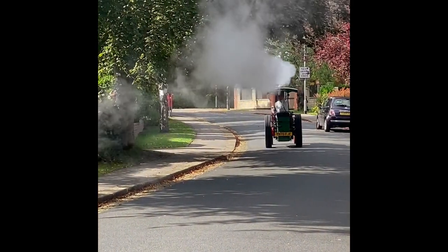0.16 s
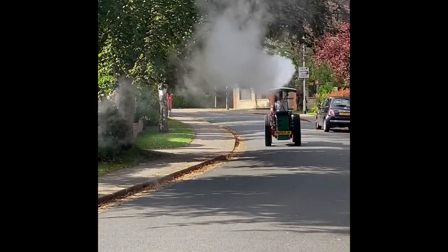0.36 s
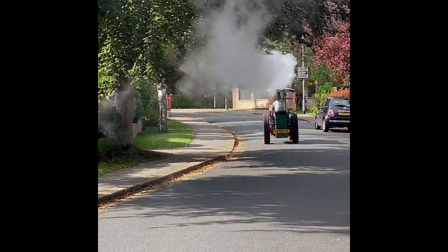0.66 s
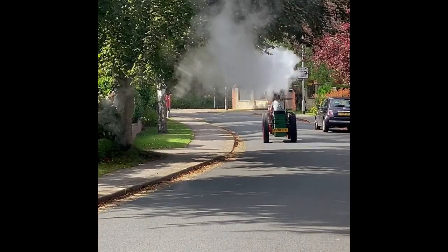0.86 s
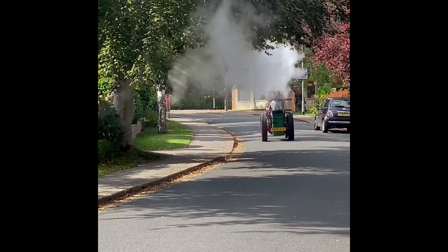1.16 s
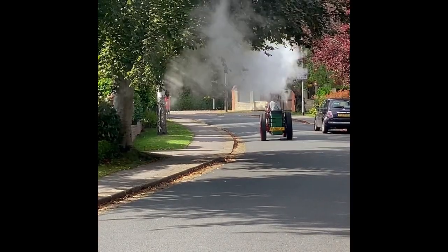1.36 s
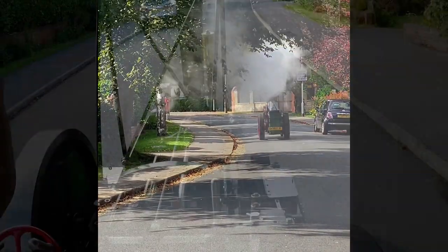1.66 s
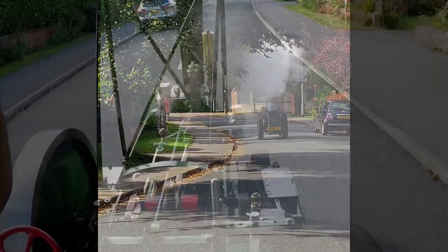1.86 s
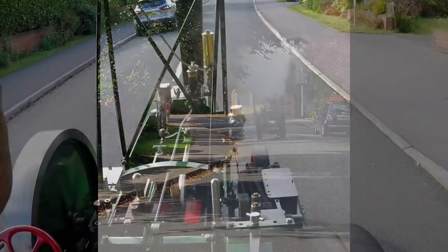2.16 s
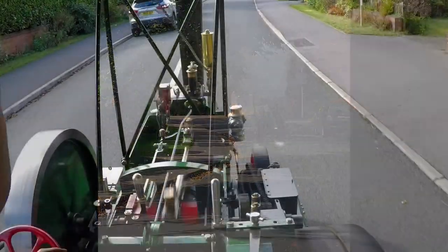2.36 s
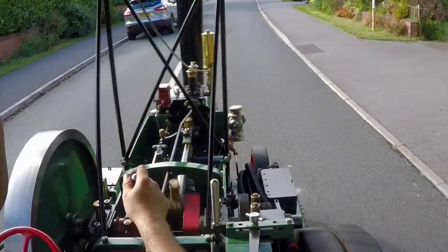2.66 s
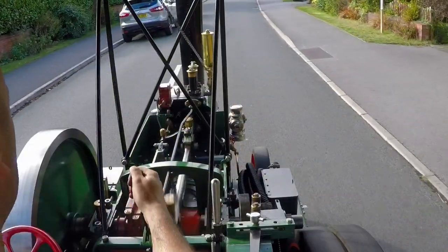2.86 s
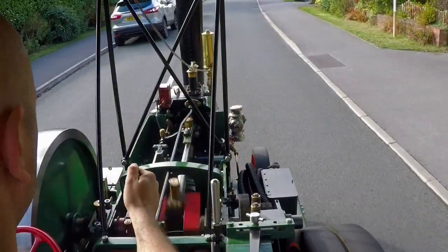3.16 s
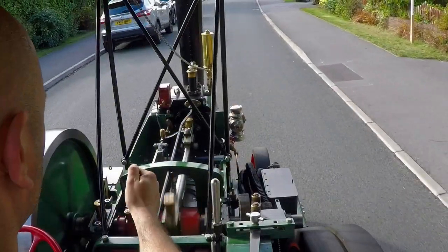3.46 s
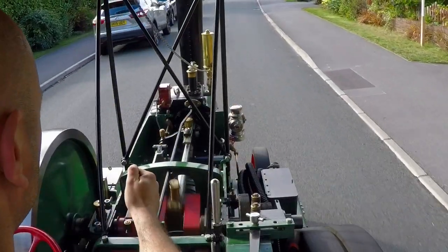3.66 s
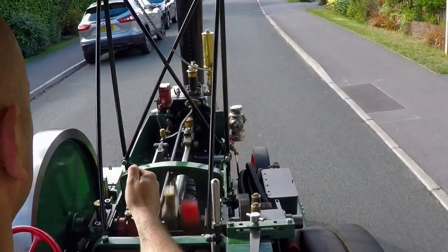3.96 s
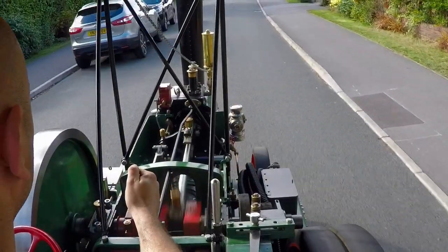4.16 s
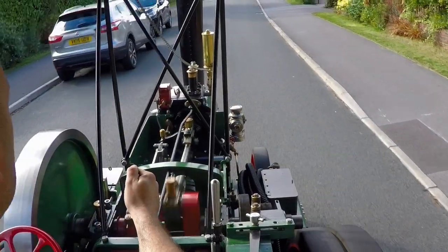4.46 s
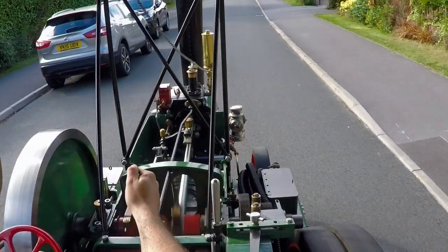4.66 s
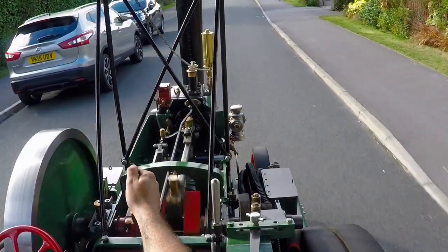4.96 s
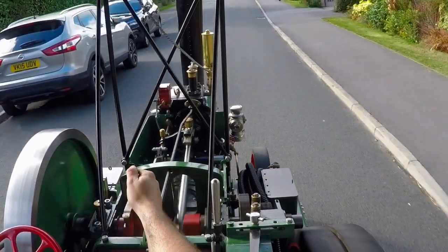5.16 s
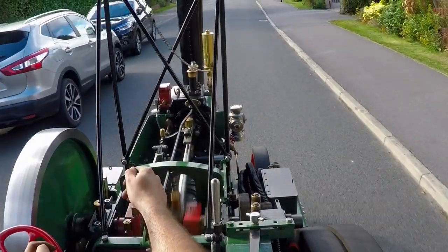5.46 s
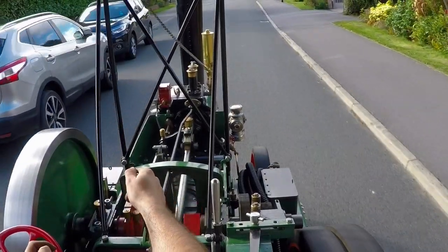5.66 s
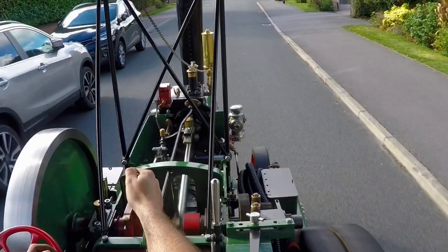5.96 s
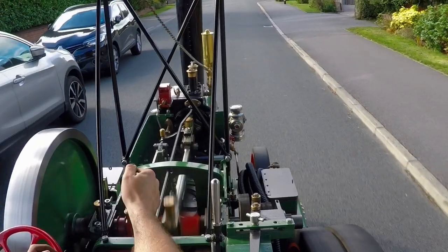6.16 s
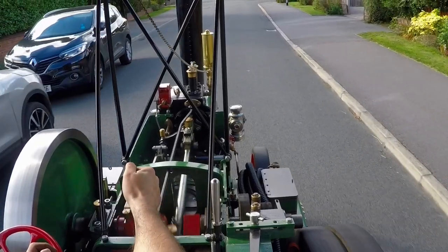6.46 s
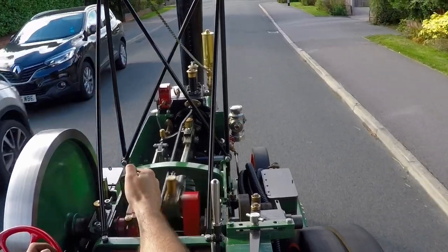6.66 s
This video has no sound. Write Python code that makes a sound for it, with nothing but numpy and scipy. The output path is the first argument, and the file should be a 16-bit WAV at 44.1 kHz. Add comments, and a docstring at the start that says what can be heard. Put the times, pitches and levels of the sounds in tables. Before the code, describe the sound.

First a quiet, wide, distant view of a steam tractor: fast fluttering puffs of steam over leak hiss, hollow low chuffs and boiler throb, reflected lightly off house fronts. It dissolves into a close, dry, centred sound at the controls, far louder and bass-heavy. About eight strong exhaust beats a second, each with a weaker return, drive rumbling iron, tooth rattle, random hard knocks, linkage snaps and faint spitting steam.

```python
"""Small steam tractor, from street and seat

A small steam tractor chuffs along a suburban road, heard first from far down the street over a wash of wheels and gears.
Steam puffs are shaped noise bursts, one a crank turn; chuffs are struck chimney and boiler modes.
The scene dissolves to the driving seat: one exhaust beat of each turn is strong and one weak, the piston shakes
the frame, and random tooth contacts, knocks and snaps make loose gears and rods clatter in the iron body."""
import sys
import numpy as np
from scipy import signal
from scipy.fft import rfft, irfft, next_fast_len
from scipy.io import wavfile
from scipy.ndimage import uniform_filter1d, map_coordinates

SR = 44100
rng = np.random.default_rng(int(sys.argv[2]) if len(sys.argv) > 2 else 0)


def generate_wav(sig):
    """Save sig (samples, or channels by samples) to the path in sys.argv[1] as 16-bit PCM at SR."""
    pcm = np.round(np.clip(np.atleast_2d(sig).T, -1, 1) * 32767).astype(np.int16)
    wavfile.write(sys.argv[1], SR, pcm)


N = 300762


def amp(db):
    """Decibels to gain."""
    return 10 ** (np.asarray(db) / 20)


def unit(x):
    """Scaled to rms 1."""
    return x / np.sqrt(np.mean(x ** 2) + 1e-20)


def clock():
    """The time of every sample in s."""
    return np.arange(N) / SR


def along(curve, s):
    """The value of a (time_s, value) curve at times s."""
    return np.interp(s, *np.transpose(curve))


def wobble(rate_hz):
    """A smooth random curve through rate_hz knots a second."""
    knots = rng.standard_normal(int(N * rate_hz / SR) + 4)
    return map_coordinates(knots, [clock() * rate_hz])


def uneven(s, spread_db):
    """A random change of level for each stroke."""
    return spread_db * rng.standard_normal(len(s))


def filtered(x, response):
    """x times a complex response of frequency."""
    m = next_fast_len(N + SR // 2)
    return irfft(rfft(x, m) * response(np.fft.rfftfreq(m, 1 / SR)), m)[..., :N]


def high_pass(x, edge_hz):
    """A steep bass cut."""
    return filtered(x, lambda hz: 1 - 1 / (1 + (hz / edge_hz) ** 10))


def coloured(x, spectrum):
    """x shaped by (pitch_hz, relative_db) points on a log axis, at rms 1."""
    f, db = np.transpose(spectrum)
    return unit(filtered(x, lambda hz: amp(np.interp(np.log(hz + 1), np.log(f), db))))


def resonance(hz, centre_hz, width_hz):
    """Complex response of one damped mode, 1 at its centre."""
    damping = 1j * hz * width_hz
    return damping / (centre_hz * centre_hz - hz * hz + damping)


def resonances(x, modes):
    """x rung through (pitch_hz, width_hz, relative_db) modes, at rms 1; little passes far above the last."""
    top_hz = 2.0 * modes[-1][0]

    def response(hz):
        # alternate signs, as neighbouring modes move in opposition
        body = sum((-1) ** k * amp(db) * resonance(hz, c, w) for k, (c, w, db) in enumerate(modes))
        return body / np.sqrt(1 + (hz / top_hz) ** 10)

    return unit(filtered(x, response))


def notched(x, dips, depth_db):
    """x with a narrow dip at each (pitch_hz, width_hz)."""
    def response(hz):
        return np.prod([1 - (1 - amp(depth_db)) * resonance(hz, c, w) for c, w in dips], axis=0)

    return filtered(x, response)


def shifting(x, depth_db, span_hz, span_s):
    """The colour wanders in random patches of time and frequency."""
    z = signal.stft(x, nperseg=256)[2]
    bins = max(2, round(span_hz * 256 / SR))
    frames = max(2, round(span_s * SR / 128))
    field = uniform_filter1d(rng.standard_normal(z.shape), bins, axis=0)
    field = uniform_filter1d(field, frames, axis=1)
    out = signal.istft(z * amp(depth_db * unit(field)), nperseg=256)[1][:N]
    return np.std(x) * unit(out)


def add(track, s, sound):
    """Mixes a sound in at time s."""
    start = round(s * SR)
    part = sound[max(-start, 0):max(N - start, 0)]
    track[max(start, 0):][:len(part)] += part


def strokes(times, levels_db, modes, attack_s, scatter, vary_db):
    """Each stroke rings (pitch_hz, level_db, t60_s) modes at slightly new pitches and strengths."""
    track, t = np.zeros(N), np.arange(SR // 3) / SR
    for s, stroke_db in zip(times, levels_db):
        ring = np.zeros(len(t))
        for hz, mode_db, t60_s in modes:
            louder, sharper = rng.standard_normal(2)
            decay = amp(mode_db + vary_db * louder - 60 * t / t60_s)
            ring += decay * np.sin(2 * np.pi * hz * (1 + scatter * sharper) * t)
        add(track, s, amp(stroke_db) * ring * (1 - np.exp(-t / attack_s)))
    return track


def bursts(times, levels_db, rise_s, hold_s, t60_s):
    """An envelope that opens at each time, holds and dies away."""
    track, t = np.zeros(N), np.arange(SR // 3) / SR
    for s, db in zip(times, levels_db):
        decay = amp(db - 60 * np.maximum(t - hold_s, 0) / t60_s)
        add(track, s, decay * (1 - np.exp(-t / rise_s)))
    return track


def contacts(rate_hz, spread_db, smooth):
    """Random tiny impacts of uneven size, of teeth or droplets, over a smooth noise."""
    hits = (rng.random(N) < rate_hz / SR) * rng.choice([-1, 1], N)
    hits = hits * amp(spread_db * rng.standard_normal(N))
    return unit(unit(hits) + smooth * rng.standard_normal(N))


def turns(first_s, speed):
    """The time of each power stroke: one for every whole turn of the crank."""
    t = first_s + clock()
    angle_turns = np.cumsum(along(speed, t)) / SR
    return np.interp(np.arange(int(angle_turns[-1]) + 1), angle_turns, t)


# wash of the street [pitch_hz, relative_db]
STREET_SPECTRUM = [(45, -32), (130, -4.5), (270, -13), (400, -7), (500, -24), (620, -27), (740, -22),
                   (1000, -16), (1500, -24.5), (1900, -24), (2250, -24), (2900, -27.5), (4500, -34.5),
                   (7000, -58)]
# strength of the wash [time_s, relative_db]
STREET_LEVEL = [(0, -39.5), (.2, -41.5), (.5, -42.5), (1, -46.5), (1.4, -43), (2.4, -50)]


def street_wash():
    """Road wheels and gears smeared along the street: noise partly shared by the ears."""
    wash = coloured(rng.standard_normal(N) + .5 * rng.standard_normal((2, N)), STREET_SPECTRUM)
    return wash * amp(along(STREET_LEVEL, clock()) + 4.0 + 0.93 * wobble(30.1))


def house_fronts(x, count):
    """A few early echoes, different in each ear."""
    walls = np.zeros((2, SR // 25))
    for ear in walls:
        ear[rng.integers(SR // 500, len(ear), count)] = rng.standard_normal(count)
        ear /= np.linalg.norm(ear)
    return signal.fftconvolve(x[None], walls, axes=1)[:, :N]


# distant puffs of steam [peak_s, level_db]
PUFFS = [(.021, -28.5), (.121, -27.5), (.216, -30), (0.315, -28.5), (.423, -27.5), (.518, -28.5),
         (.622, -28.5), (.718, -32.5), (0.814, -27), (.920, -27), (1.015, -28.5), (1.121, -26.5),
         (1.22, -25), (1.327, -31.5), (1.426, -35), (1.527, -29.5), (1.628, -28), (1.718, -31),
         (1.827, -29), (1.930, -30), (2.040, -39), (2.137, -35.5)]
# hiss of a puff [pitch_hz, relative_db]
HISS_SPECTRUM = [(500, -9.5), (1500, -9), (1900, -1), (2300, -11), (2900, -1), (3600, -3), (4800, -5),
                 (6500, -8), (8500, 1), (10000, 2.5), (11200, -24), (15000, -12)]
# steady leak of steam [pitch_hz, relative_db]
LEAK_SPECTRUM = [(250, -10), (600, -7), (1000, 0.5), (1500, -3.5), (1900, 4), (2250, -3), (2900, -2.5),
                 (3600, -6), (4800, -3.5), (6500, -2), (8500, -1), (10000, 0), (11200, -21), (15000, -12)]
# strength of the leak [time_s, level_db]
LEAK_LEVEL = [(0, -37), (.65, -39.5), (.85, -37), (1.2, -37), (1.35, -40.5), (2.24, -42)]
# edge tones of the steam jet [pitch_hz, width_hz, relative_db]
JET_MODES = [(1960, 70, 0), (2466, 50, 1), (2813, 75, 1.5), (2966, 30, 2.5), (3440, 54, -7),
             (5130, 150, -12), (7060, 16, -3), (8470, 50, -4)]
# strength of the edge tones [time_s, level_db]
JET_LEVEL = [(0, -51.5), (.6, -49.5), (.72, -51.5), (.93, -44.5), (1.05, -48.5), (1.2, -45), (1.35, -56),
             (2.2, -58)]


def far_steam():
    """Steam puffs once a turn over a steady leak, its jet singing; heard directly and off the house fronts."""
    swell_s = 0.04  # opening to peak
    peak_s, puff_db = np.transpose(PUFFS)
    open_s = peak_s - swell_s
    puffs = bursts(open_s, puff_db, rise_s=0.043, hold_s=swell_s + 0.0031, t60_s=0.045)
    puffs *= coloured(contacts(rate_hz=1700, spread_db=2, smooth=1.2), HISS_SPECTRUM)
    leak = amp(along(LEAK_LEVEL, clock())) * coloured(rng.standard_normal(N), LEAK_SPECTRUM)
    hiss = amp(1.2 * wobble(120)) * (puffs + leak)
    surge = unit(0.48 + bursts(open_s, np.zeros(len(open_s)), rise_s=.02, hold_s=0.049, t60_s=0.099))
    song = surge * amp(along(JET_LEVEL, clock())) * resonances(rng.standard_normal(N), JET_MODES)
    steam = shifting(hiss, depth_db=2.5, span_hz=700, span_s=0.03) + song
    # left ear early, right ear late
    shift_s = .000054 * np.array([[1], [-1]])
    direct = filtered(steam, lambda hz: np.exp(2j * np.pi * hz * shift_s))
    return direct + amp(-4.5) * house_fronts(steam, count=16)


# crank speed in the street view [time_s, turns_per_s]
FAR_SPEED = [(0, 9.979)]
# cross-fade from street to seat [start_s, end_s]
DISSOLVE = (1.51, 2.514)


def far_turns():
    """The power strokes heard from the street, until that view has faded."""
    s = turns(first_s=-.067, speed=FAR_SPEED)
    return s[s < DISSOLVE[1]]


# distant chimney modes [pitch_hz, relative_db, t60_s]
FAR_CHIMNEY = [(207.4, 7, 0.115), (195, -4, 0.085)]
# strength of the distant chuffs [time_s, relative_db]
FAR_CHUFF_LEVEL = [(0, -27), (.5, -26.5), (.8, -23), (1.1, -24.5), (1.6, -24)]
# distant chimney's overtone [pitch_hz, relative_db, t60_s]
FAR_OVERTONE = [(405, 0, .11)]
# strength of the overtone [time_s, level_db]
FAR_OVERTONE_LEVEL = [(0, -41), (.5, -36.5), (.85, -39), (1.35, -35), (1.7, -37)]
# distant boiler modes [pitch_hz, relative_db, t60_s]
FAR_BOILER = [(59.4, 2, 0.53), (69.8, -6, 0.39), (79.3, 1, 0.31), (127, -15, .12)]
# strength of the boiler's throb [time_s, relative_db]
FAR_THROB_LEVEL = [(0, -32.5), (.5, -33.5), (.8, -39.5), (1.05, -35.5), (1.25, -40), (1.6, -34.5),
                   (2.24, -41)]


def far_exhaust():
    """Two hollow chuffs a turn ring the chimney over the throb of the boiler."""
    return_db, return_s = -0.5, .053  # return stroke against power stroke
    s = far_turns()
    both_s = np.concatenate([s, s + return_s])
    both_db = along(FAR_CHUFF_LEVEL, both_s) + np.repeat([0, return_db], len(s))
    chuffs = strokes(both_s, both_db, FAR_CHIMNEY, attack_s=.011, scatter=.01, vary_db=1.1)
    overtone_db = along(FAR_OVERTONE_LEVEL, both_s)
    overtone = strokes(both_s, overtone_db, FAR_OVERTONE, attack_s=.006, scatter=.009, vary_db=1.1)
    throb_db = along(FAR_THROB_LEVEL, s) + 3
    throb = strokes(s, throb_db, FAR_BOILER, attack_s=.012, scatter=.003, vary_db=.5)
    return chuffs + overtone + throb


def from_street():
    """The distant engine: wash, exhaust and steam across both ears."""
    return high_pass(far_exhaust() + street_wash(), edge_hz=50) + far_steam()


# crank speed in the seat view [time_s, turns_per_s]
NEAR_SPEED = [(2.7, 7.896), (4.6, 8.234), (6.8, 8.407)]


def near_turns():
    """The power strokes heard from the seat, and the effort of each in dB, which rises with speed."""
    effort_db_per_turn_rate = 3.5  # dB per (turn per s)
    s = turns(first_s=1.648, speed=NEAR_SPEED)
    s = s[s < N / SR]
    speed = along(NEAR_SPEED, s)
    return s, effort_db_per_turn_rate * (speed - speed.mean())


# sharp snaps of the linkage pins [start_s, level_db]
SNAPS = [(2.617, -39), (2.751, -34.5), (2.8828, -35.5), (3.257, -39), (3.3555, -36), (3.375, -41),
         (3.4325, -33.5), (3.859, -34), (3.9264, -35), (4.224, -35), (4.3692, -35.5), (4.6318, -35),
         (5.485, -36), (5.718, -31.5), (6.2785, -36.5)]
# snap and patter [pitch_hz, relative_db]
SNAP_SPECTRUM = [(1000, -14), (2500, 6.5), (3700, 6), (5000, -1), (7000, -9), (9000, -17.5), (11500, -21.5),
                 (15000, -26)]
# clacks of loose links [start_s, level_db]
CLACKS = [(2.453, -41), (2.686, -33), (3.197, -40), (3.243, -38), (3.333, -35.5), (3.946, -39.5),
          (4.08, -38.5), (4.806, -41), (4.897, -34.5), (5.153, -38), (5.738, -41), (6.245, -31.5),
          (6.365, -36.5), (6.715, -37)]
# clack [pitch_hz, relative_db]
CLACK_SPECTRUM = [(1000, -23), (3000, 4.5), (4000, 0), (4700, -4), (5500, -14.5), (7000, -22), (15000, -40)]


def linkage():
    """Pins snap sharply in their eyes and loose links clack, over a fine patter of small ticks."""
    snaps = bursts(*np.transpose(SNAPS), rise_s=.0001, hold_s=.0004, t60_s=.011)
    snaps *= coloured(rng.standard_normal(N), SNAP_SPECTRUM)
    clacks = bursts(*np.transpose(CLACKS), rise_s=0.0018, hold_s=0.0025, t60_s=0.04)
    clacks *= coloured(contacts(rate_hz=850, spread_db=4, smooth=0.96), CLACK_SPECTRUM)
    patter = amp(-58) * coloured(contacts(rate_hz=400, spread_db=2.5, smooth=0), SNAP_SPECTRUM)
    return snaps + clacks + patter


def plates(x, t60_s, ring_db):
    """Bolted sheet metal adds a short ring of many close modes."""
    t = np.arange(SR // 6) / SR
    tail = rng.standard_normal(len(t)) * amp(-60 * t / t60_s)
    ring = signal.fftconvolve(x, tail / np.linalg.norm(tail))[:N]
    return x + amp(ring_db) * high_pass(ring, edge_hz=1540)


# flow of steam from the gland [time_s, relative_db]
GLAND_FLOW = [(1.65, -54), (2.7, -55), (3.1, -56.5), (3.6, -53), (4.2, -49), (5.1, -48.5), (5.5, -53.5),
              (6.3, -57), (6.7, -50)]
# spitting steam [pitch_hz, relative_db]
GLAND_SPECTRUM = [(1500, -10.5), (3500, -5.5), (4800, -9), (6400, -11.5), (8400, -16.5), (10200, -14.5),
                  (11200, -25), (15000, -33)]
# thin resonances of valve gear and gland [pitch_hz, width_hz, relative_db]
BRASS_MODES = [(3700, 740, 2.5), (4760, 650, 4), (5950, 26, 9), (6800, 110, -10), (7700, 97, -1),
               (8900, 240, -8.5), (9490, 160, 2), (10200, 340, -2.5)]


def valve():
    """Steam spits from the gland on each power stroke while the valve gear sings thinly."""
    s, _ = near_turns()
    steam_db = along(GLAND_FLOW, s) + uneven(s, spread_db=.7) - 6.0
    flow = bursts(s - .010, steam_db, rise_s=0.0024, hold_s=0.051, t60_s=0.086)
    flow += amp(-64.0 + 2.8 * wobble(32))
    droplets = contacts(rate_hz=1400, spread_db=0.0, smooth=0.9)
    spit = flow * amp(1.5 * wobble(65)) * coloured(droplets, GLAND_SPECTRUM)
    sing = flow * amp(-1.5 + 3.0 * wobble(60))
    sing *= resonances(contacts(rate_hz=890, spread_db=1.5, smooth=0.91), BRASS_MODES)
    return shifting(plates(spit, t60_s=0.039, ring_db=-8.0) + sing, depth_db=4.0, span_hz=1500, span_s=0.027)


# hard knocks of slack gears and rods [start_s, level_db, tilt_db_per_octave]
KNOCKS = [(2.022, -12, -4.5), (2.288, -21, 1), (2.412, -9.5, 6), (2.534, -13, 1), (2.551, -18.5, -6),
          (2.660, -11.5, -0.5), (2.685, -6, 15), (2.911, -11, 3), (3.036, -18.5, 4), (3.155, -17.5, -2.5),
          (3.285, -10.5, 3), (3.4146, -8, -1), (3.536, -9, 5.5), (3.663, -9, 5), (3.784, -13.5, 7),
          (3.898, -19.5, 4.5), (4.021, -10.5, 0), (4.045, -13.5, 2.5), (4.138, -15.5, 1), (4.154, -14, 0),
          (4.302, -16, -2), (4.352, -17.5, -2.5), (4.524, -13.5, 6), (4.597, -17.5, 1), (4.838, -14, -1),
          (4.886, -11.5, -4), (5.005, -14, 7), (5.251, -19, -1), (5.3556, -7, 2), (5.705, -14, 2.5),
          (5.733, -14.5, 1), (5.983, -17, 0), (6.089, -10.5, -0.5), (6.455, -16.5, 3), (6.566, -8.5, 1),
          (6.685, -13, 0)]
# knocks of every turn: slack taken up, bite, reversal [after_power_stroke_s, level_db, tilt_db_per_octave]
TURN_KNOCKS = [(-.003, -17.5, 6.5), (.014, -20, -4), (.073, -24, -3)]


def turn_knocks(s):
    """Light knocks of every turn, as KNOCKS rows; a hard knock takes the place of a light one."""
    rows = []
    for delay_s, db, tilt in TURN_KNOCKS:
        rows.append(np.column_stack([s + delay_s, db + uneven(s, spread_db=0.5), np.full(len(s), tilt)]))
    rows = np.vstack(rows)
    gap_s = np.abs(rows[:, :1] - np.transpose(KNOCKS)[0]).min(axis=1)
    return rows[gap_s > .007]


# resonances of gears and plates [pitch_hz, width_hz, relative_db]
IRON_MODES = [(281.9, 21.5, 2.5), (436, 35, 0), (497.4, 15.8, 4.5), (734, 125, -7), (925.4, 34.7, 4),
              (1121, 39, 3.5), (1192, 41, 2), (1238.3, 30.5, 4), (1500, 92, -5), (1657, 74, -5),
              (1885, 33, -7), (2190, 87, -13), (2457, 104, -10), (2800, 70, -18)]


def knocks(times, levels_db, tilts):
    """Each knock cracks and rings the iron body with its own brightness; narrow modes ring longest."""
    tilt_pivot_hz = 1100
    modes = [(c, db, np.log(1000) / np.pi / width) for c, width, db in IRON_MODES]
    modes.append((1520, 9.5, .009))  # crack of the hard contact: pitch_hz, relative_db, t60_s
    hz, mode_db, t60_s = np.transpose(modes)
    track = np.zeros(N)
    for s, db, tilt in zip(times, levels_db, tilts):
        tipped_db = mode_db + tilt * np.log2(hz / tilt_pivot_hz)
        tipped_db -= 20 * np.log10(np.linalg.norm(amp(tipped_db)))  # tilt keeps the overall level
        tipped = np.column_stack([hz, tipped_db, t60_s])
        track += strokes([s], [db], tipped, attack_s=0.00042, scatter=0.014, vary_db=2.5)
    return track


# rattle of the tooth flanks [pitch_hz, relative_db]
RATTLE_SPECTRUM = [(200, -24.5), (500, 1), (1950, 2), (2250, 0.5), (2570, -1.5), (2750, -9.5), (3100, -12),
                   (4000, -20), (4700, -25), (5300, -24.5), (6500, -30), (9000, -37.5), (15000, -59.5)]
# pitches the iron body hardly radiates [pitch_hz, width_hz]
IRON_DIPS = [(1335, 77), (2000, 87), (2670, 130)]


def gears():
    """Each power stroke loads the gears, whose teeth rattle the iron body; slack is taken up with a knock."""
    s, effort_db = near_turns()
    load_db = -26.5 + effort_db + uneven(s, spread_db=0.45)
    load = bursts(s - .002, load_db, rise_s=0.001, hold_s=0.032, t60_s=0.16)
    back = bursts(s + 0.073, load_db - 3.5, rise_s=.002, hold_s=0.03, t60_s=0.11)
    rolling = amp(-32 + 1.0 * wobble(25))
    knock_s, knock_db, tilts = np.vstack([KNOCKS, turn_knocks(s)]).T
    chatter = bursts(knock_s, knock_db - 12, rise_s=.001, hold_s=.003, t60_s=.08)
    drive = np.sqrt(load ** 2 + back ** 2 + rolling ** 2 + chatter ** 2)
    teeth = drive * contacts(rate_hz=800, spread_db=2.0, smooth=0.76)
    flanks = drive * contacts(rate_hz=600, spread_db=1.5, smooth=0.77)
    rattle = amp(2.0) * resonances(teeth, IRON_MODES) + amp(-7.0) * coloured(flanks, RATTLE_SPECTRUM)
    rattle *= np.std(teeth)
    clatter = shifting(rattle, depth_db=1.88, span_hz=400, span_s=.04) + knocks(knock_s, knock_db, tilts)
    return notched(clatter, IRON_DIPS, depth_db=-5)


# low rumble at the seat [pitch_hz, relative_db]
RUMBLE_SPECTRUM = [(13, -31), (22, -18), (48, -8.5), (81, -4), (102, -8), (140, -0.5), (175, -9), (222, -7),
                   (248, -55.5), (284, -21), (350, -28), (419, -15), (488, -17.5), (545, -35.5), (600, -24),
                   (780, -35.5), (1320, -120)]


def rumble():
    """Steady low noise, its level wavering slightly."""
    return amp(-18.5 + 0.32 * wobble(12)) * coloured(rng.standard_normal(N), RUMBLE_SPECTRUM)


# frame modes [pitch_hz, relative_db, t60_s]
FRAME_MODES = [(38, 4.9, 0.4), (56.5, 5.7, 0.2), (86, 14, 0.038)]


def frame_shake():
    """The piston shoves the frame one way, then back, ringing its low modes."""
    s, _ = near_turns()
    even = np.zeros(len(s))
    forth = strokes(s + 0.01693, even - 16.5, FRAME_MODES, attack_s=0.0037, scatter=0.012, vary_db=2.5)
    back = strokes(s + 0.0759, even - 21.5, FRAME_MODES, attack_s=0.005, scatter=0.019, vary_db=2.8)
    return forth - back


# chimney modes [pitch_hz, relative_db, t60_s]
CHIMNEY_MODES = [(159.8, 3, 0.097), (138.4, -4, 0.16), (205.4, -5.5, 0.035), (273.4, -19, 0.052)]
# strength of the exhaust blast [time_s, relative_db]
BLAST_LEVEL = [(2.5, -2.5), (3.2, -1.5), (3.6, 0), (3.9, -0.5), (4.62, 0.5), (4.8, -2.5), (5.8, -2),
               (6.05, 1.5), (6.8, -4)]


def exhaust():
    """Each blast rings the chimney, which hums on more weakly through the return stroke."""
    s, _ = near_turns()
    blast_db = along(BLAST_LEVEL, s) + uneven(s, spread_db=0.8)
    blasts = strokes(s - .0005, blast_db, CHIMNEY_MODES, attack_s=0.011, scatter=0.012, vary_db=1.13)
    hum_hz = 158.3 * (1 + 0.0552 * wobble(40))
    hum = bursts(s + .035, np.full(len(s), -15.5), rise_s=0.017, hold_s=.07, t60_s=0.065)
    hum *= amp(1.8 * wobble(35)) * np.sin(2 * np.pi * np.cumsum(hum_hz) / SR)
    return blasts + hum


def from_seat():
    """The close engine in a single channel."""
    low = high_pass(rumble() + frame_shake() + exhaust(), edge_hz=30.0)
    return linkage() + valve() + gears() + low


def scene():
    """The wide street view dissolves into the close, single-channel view from the seat."""
    seat = np.interp(clock(), DISSOLVE, [0, 1])
    return (1 - seat) * from_street() + seat * from_seat()


def record(dry):
    """The very highest peaks are rounded off and nothing is kept above the band limit."""
    ceiling, top_hz = .95, 15680
    rounded = dry / (1 + (dry / ceiling) ** 10) ** (1 / 10)
    return filtered(rounded, lambda hz: hz < top_hz)


dry = scene()
out = record(dry)
generate_wav(out)
```